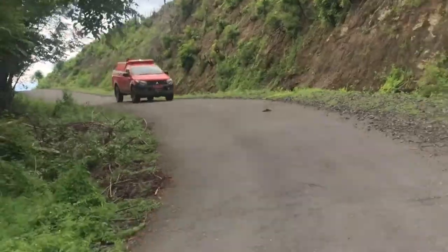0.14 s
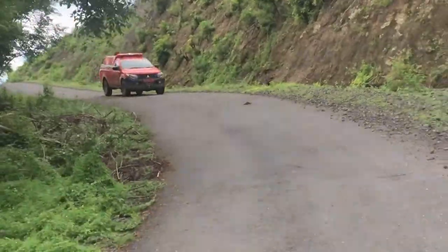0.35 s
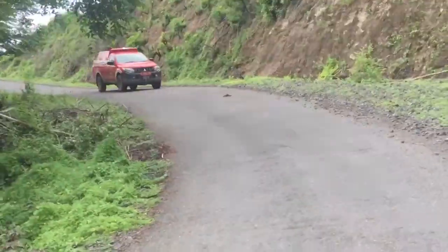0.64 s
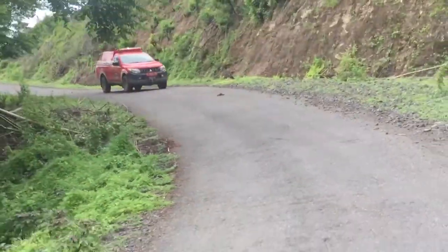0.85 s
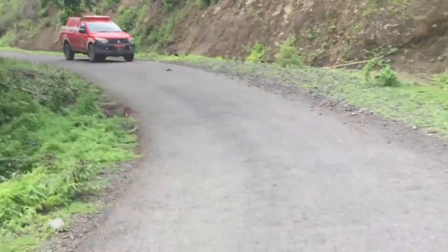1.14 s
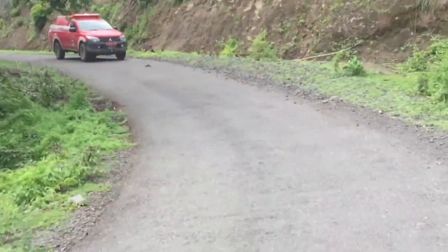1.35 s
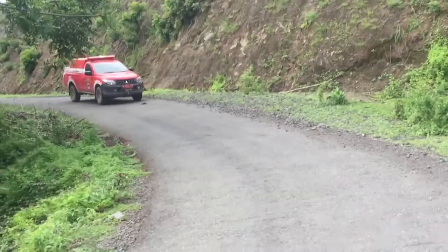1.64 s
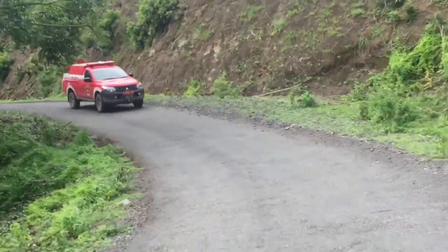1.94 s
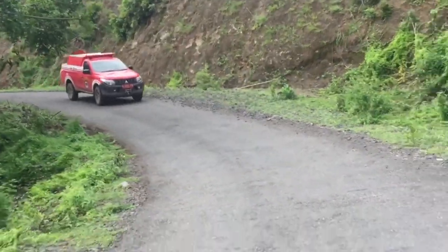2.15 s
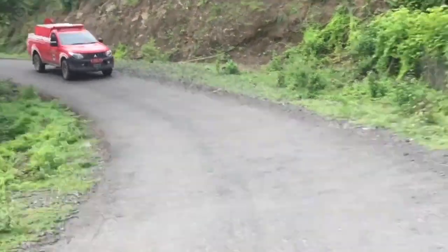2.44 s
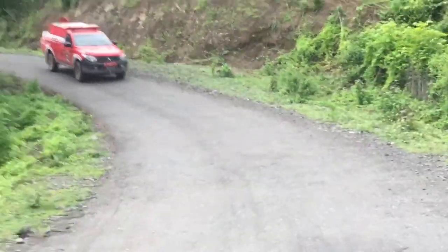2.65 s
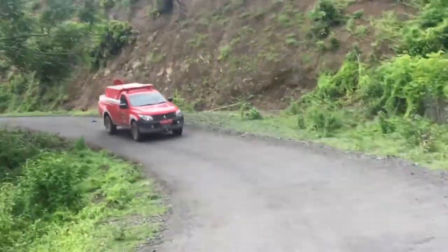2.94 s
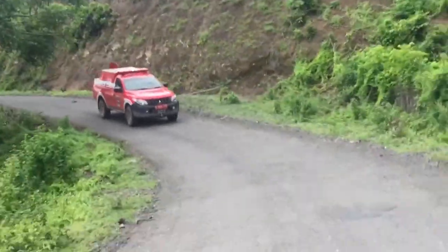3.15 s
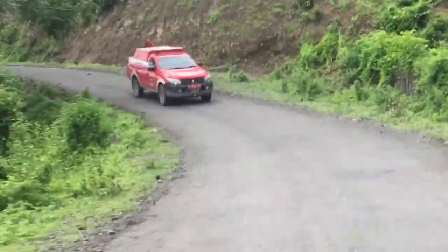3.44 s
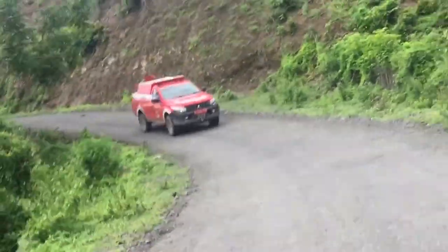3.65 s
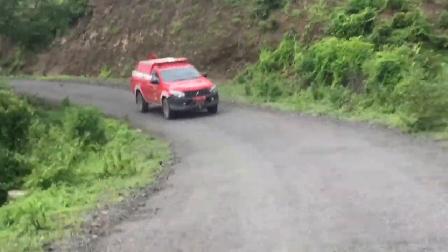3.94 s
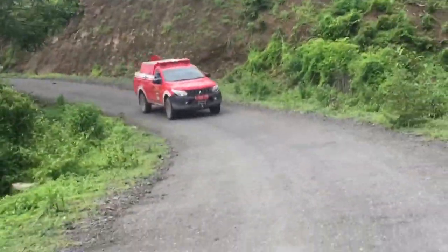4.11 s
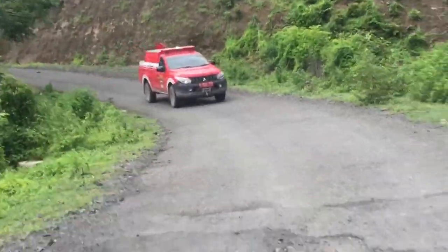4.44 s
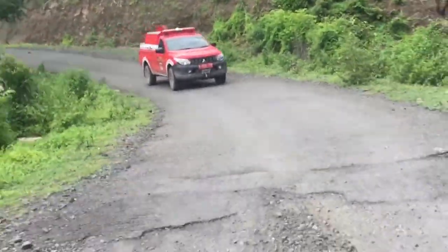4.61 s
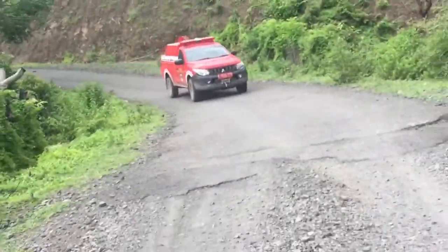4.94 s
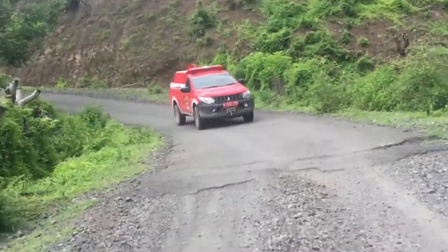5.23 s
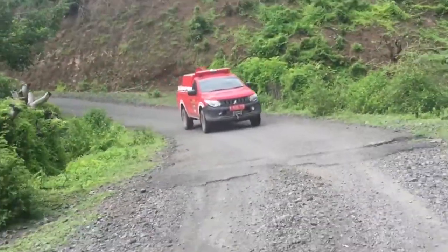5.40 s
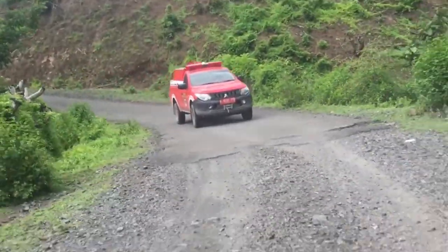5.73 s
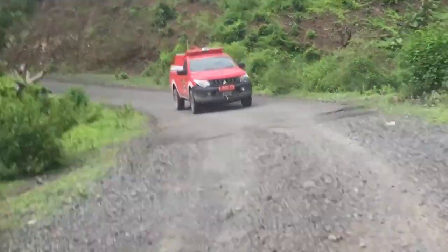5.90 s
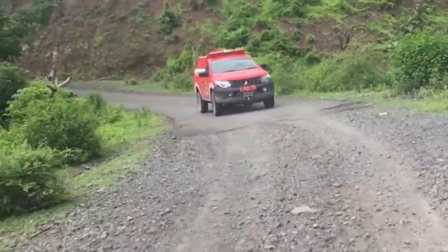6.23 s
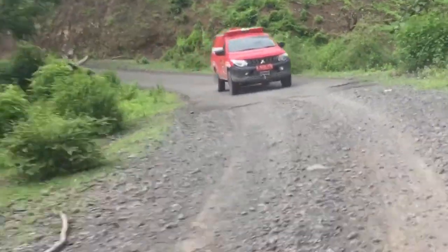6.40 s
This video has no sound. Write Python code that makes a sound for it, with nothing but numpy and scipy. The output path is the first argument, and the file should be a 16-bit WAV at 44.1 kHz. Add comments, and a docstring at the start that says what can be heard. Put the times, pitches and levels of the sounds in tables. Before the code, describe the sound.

Close, on-board sound of a truck travelling outdoors: low unsteady panel boom, quick judder and muffled suspension thumps. Thin insect rasps come and go early on. Tyre noise is modest on asphalt, then stones begin snapping and grinding, bursting loudest near the middle. Short dry metal knocks and sharp steel jingles crowd the second half, with a few bright grit ticks.

```python
"""First a dull clunk and a thump come through the floor of a truck, over a deep boom and a faint insect hiss.
We ride on its back along a mountain road that turns from worn asphalt to loose gravel.
Shaped noise makes the insects, the booming body and the roaring tyres.
Short rings and bursts of noise make the crunching stones, the knocks on the bed and the jingling steel.
"""
import sys
import numpy as np
from scipy import signal
from scipy.fft import rfft, irfft
from scipy.io import wavfile
from scipy.ndimage import uniform_filter1d

SR = 44100
rng = np.random.default_rng(int(sys.argv[2]) if len(sys.argv) > 2 else 0)


def materialize(psi):
    """Save the field psi as 16-bit PCM at rate SR to the path in sys.argv[1].

    A 1-D psi becomes a single channel; in a 2-D psi each row is a channel.
    """
    bounded = np.clip(np.atleast_2d(psi).T, -1, 1)
    quanta = np.round(bounded * 32767).astype(np.int16)
    wavfile.write(sys.argv[1], SR, quanta)


N = 289296
T = np.arange(N) / SR


def amp(db):
    """Turns decibels into a gain."""
    return 10 ** (np.asarray(db) / 20)


def evened(x):
    """Scales a sound to an rms of one."""
    return x / np.sqrt(np.mean(x ** 2) + 1e-20)


def at_level(x, db, size=441):
    """Sets the loudest 10 ms of a sound to the given level."""
    return amp(db) * x / np.sqrt(uniform_filter1d(x ** 2, size).max() + 1e-20)


def steadied(x, size=5000):
    """Takes the slow swells out of a noise, by dividing by its own level over about 0.1 s."""
    return x / np.sqrt(abs(uniform_filter1d(x ** 2, size)) + 1e-9)


def curve(rows, column=1):
    """Joins one column of a table by straight lines in time."""
    rows = np.asarray(rows)
    return np.interp(T, rows[:, 0], rows[:, column])


def swells(rows, attack_s, t60):
    """Gain of events that each rise, hold, and start to die away once their length has passed."""
    total = 0
    for s, length, db in rows:
        rise = np.clip((T - s) / attack_s, 0, 1)
        fall_db = 60 * np.clip((T - s - length) / t60, 0, 2)
        total = total + rise * amp(db - fall_db)
    return total


def fading_noise(t, t60):
    """A burst of noise that loses 60 dB in t60 seconds."""
    return rng.standard_normal(len(t)) * amp(-60 * t / t60)


def add(mix, s, sound):
    """Mixes a sound in at time s."""
    part = mix[max(round(s * SR), 0):][:len(sound)]
    part += sound[:len(part)]


def colour(x, spectrum, size=8192):
    """Gives a sound a spectrum with a filter that never acts ahead of time, so attacks stay sharp."""
    hz, db = np.transpose(spectrum)
    f = abs(np.fft.fftfreq(size, 1 / SR)) + 1
    log_gain = np.log(amp(np.interp(np.log(f), np.log(hz), db, left=db[0] - 9.5)))
    # the Hilbert transform finds the phase that packs the response at its start
    response = np.fft.ifft(np.exp(np.conj(signal.hilbert(log_gain)))).real[:size // 2]
    return signal.fftconvolve(x, response)[:len(x)]


def hiss(spectrum):
    """Steady noise with the given spectrum, falling away beyond its ends."""
    hz, db = np.transpose(spectrum)
    f = np.fft.rfftfreq(N, 1 / SR) + 1
    gain = amp(np.interp(np.log(f), np.log(hz), db))
    gain = gain * np.minimum(f / hz[0], 1) ** 2 * np.minimum(hz[-1] / f, 1) ** 2
    return evened(irfft(rfft(rng.standard_normal(N)) * gain, N))


def band(hz, width_hz):
    """Noise around one pitch, 12 dB down at the edges of its width; at zero hertz, a slow random wander."""
    f = np.fft.rfftfreq(N, 1 / SR)
    gain = 1 / (1 + (2 * (f - hz) / width_hz) ** 2) ** 2
    return evened(irfft(rfft(rng.standard_normal(N)) * gain, N))


def contacts(t, bounce_s, count=14):
    """A part grazes, strikes home and chatters to rest: a run of clicks that grow, then fade."""
    hits = np.zeros(len(t))
    gaps, sizes, signs = rng.random((3, count))
    when = np.cumsum(gaps * np.linspace(0, 1.5, count))  # the gaps tend to widen
    at = np.minimum((when * bounce_s * SR).astype(int), len(t) - 1)
    hits[at] = np.sign(signs - .5) * (.4 + sizes) * (.4 + when) * np.exp(-when)
    return hits


def struck(modes, t, vary_db, detune, lift_db=0):
    """Modes ring after a contact; where it lands changes their strengths and, slightly, their pitch."""
    hz, db, t60 = np.transpose(modes)[:, :, None]
    place, shift, side = rng.standard_normal((3, *hz.shape))
    hz = hz * (1 + detune * shift * np.minimum(.05 / t60, 1))  # long rings shift less
    strength = np.sign(side) * amp(db + lift_db + vary_db * place - 60 * t / t60)
    return (strength * np.sin(2 * np.pi * hz * t)).sum(0)


def pebble(t60, order=22):
    """The short ring of one hard contact: a handful of chance modes, the higher dying sooner."""
    t = np.arange(SR // 30) / SR
    steps, turn, size = rng.random((3, order, 1))
    hz = np.geomspace(400, 14000, order)[:, None] * (.88 + .24 * steps)
    life = t60 * np.sqrt(2000 / hz)  # t60 is the life at 2 kHz
    strength = (.3 + size) * hz ** .75 * amp(-60 * t / life)
    return (strength * np.sin(2 * np.pi * (hz * t + turn))).sum(0)


def walls(x, wet_db=-7, t60=0.087):
    """The steel sides of the truck bed scatter each sound for a moment."""
    t = np.arange(SR // 10) / SR
    echoes = fading_noise(t, t60) * (t > .003)
    return x + amp(wet_db) * signal.oaconvolve(x, echoes / np.linalg.norm(echoes))[:N]


# swelling phrases of a near insect: (time [s], length [s], level [dB])
INSECT_PHRASES = [(.02, 0.24, -64), (.36, 0.28, -64.5), (.98, 0.45, -66), (1.6, .5, -65.5)]


def insects(far_db=-72, near_db=0, waver_db=2):
    """Narrow noise rasps like a near insect that comes and goes, over a distant, wavering hiss."""
    phrases = 0
    for s, length, db in INSECT_PHRASES:
        phrases = phrases + amp(db) * np.sin(np.pi * np.clip((T - s) / length, 0, 1)) ** 2
    near = band(8180, 480) * phrases * amp(near_db)
    far = band(8900, 2000) * amp(far_db + waver_db * band(0, 12))
    return near + far


# tone of the body's boom: (frequency [Hz], relative level [dB per Hz])
BOOM_SPECTRUM = [(20, -31), (32, -24.5), (45, -9), (58, -1.5), (72, 0), (90, -2.5), (115, -9.5),
                 (170, -41.5)]
# tone of the panels' judder: (frequency [Hz], relative level [dB per Hz])
JUDDER_SPECTRUM = [(70, -45), (115, -1), (150, 0), (185, 0), (240, -7), (320, -11.5), (420, -27),
                   (700, -38.5)]
# how hard the road rocks the body, before sway: (time [s], level [dB])
ROCKING_LEVELS = [(0, -23), (.42, -23), (.76, -23.5), (.85, -33), (.97, -21), (1.85, -24.5), (2.05, -28.5),
                  (2.25, -24.5), (2.64, -25.5), (2.72, -31.5), (3.05, -32.5), (3.26, -25.5), (3.54, -31),
                  (3.73, -19), (3.95, -24), (5.4, -22.5), (6.1, -21), (6.56, -25)]
# the body drops on its springs and booms: (time [s], length [s], level [dB])
SPRING_DROPS = [(.72, 0.029, -17), (3.71, 0.051, -26), (5.1, 0.044, -14), (5.25, 0.065, -18.5),
                (5.52, 0.068, -17.5), (6.47, 0.09, -17)]
DROP_ATTACK_S, DROP_T60_S = 0.034, 0.14
# rough stretches that set the panels juddering, before judder_db: (time [s], length [s], level [dB])
ROUGH_STRETCHES = [(.03, 0.072, -27.5), (.26, 0.59, -28.5), (.92, 0.081, -25.5), (1.28, 0.27, -26.5),
                   (1.84, 0.1, -24), (2.77, 0.08, -25), (3.05, .3, -26), (3.61, 0.15, -21),
                   (4.03, 0.25, -24), (4.56, 0.21, -30.5), (5.15, 0.13, -23.5), (5.39, 0.17, -23),
                   (5.75, 0.48, -26), (6.37, 0.083, -29)]
RUT_ATTACK_S, RUT_T60_S = 0.013, 0.23


def body(boom_db=0.0, judder_db=-1, idle_judder_db=-8, sway_db=1.73):
    """The road shakes the truck's panels: a deep boom, and a quicker judder that flares in the ruts."""
    rocking = amp(curve(ROCKING_LEVELS) + sway_db * band(0, 22))
    booming = np.hypot(rocking, swells(SPRING_DROPS, DROP_ATTACK_S, DROP_T60_S))
    shaking = np.hypot(rocking * amp(idle_judder_db), swells(ROUGH_STRETCHES, RUT_ATTACK_S, RUT_T60_S))
    boom = steadied(hiss(BOOM_SPECTRUM)) * booming * amp(boom_db)
    judder = steadied(hiss(JUDDER_SPECTRUM)) * shaking * amp(judder_db)
    return boom + judder


# potholes, before the two trims: (time [s], thump level [dB], thump pitch [Hz], clunk level [dB])
POTHOLES = [(.038, -20, 160, -22), (.091, -33, 125, -21.5), (1.292, -16, 98, -36), (1.914, -13, 197, -17),
            (1.93, -14.5, 135, -33), (2.824, -15.5, 165, -32.5), (3.642, -17.5, 194, -17),
            (3.742, -11, 120, -47), (4.078, -11, 177, -33), (4.598, -9.5, 104, -25.5)]


def suspension(thump_db=-1, thump_t60=0.034, clunk_db=-3.5, clunk_t60=0.08):
    """Potholes send a short low tone and a dull burst of noise through the chassis."""
    out, t = np.zeros(N), np.arange(SR // 5) / SR
    clunk_spectrum = [(150, -2), (270, 4.0), (420, 7), (550, 2), (700, -2.5),
                      (1100, -32.5), (4000, -42), (12000, -67)]  # (Hz, dB)
    for s, push_db, hz, clatter_db in POTHOLES:
        push = np.sin(2 * np.pi * hz * t) * amp(-60 * t / thump_t60) * (1 - np.exp(-t / 0.0058))
        shake = fading_noise(t, clunk_t60) * (1 - np.exp(-t / 0.0046))
        clunk = colour(shake, clunk_spectrum)
        add(out, s, at_level(push, push_db + thump_db) + at_level(clunk, clatter_db + clunk_db))
    return out


# tone of the tyres' roar: (frequency [Hz], relative level [dB per Hz])
ROAR_SPECTRUM = [(150, 7), (350, 4.5), (550, 1), (780, -2.5), (1000, -1), (1250, -5.5), (1800, -7.5),
                 (2500, -13), (2900, -17), (4000, -23), (5000, -28.5), (7200, -38.5), (11000, -41.5),
                 (16000, -46)]
# asphalt turning to gravel: (time [s], tyre roar before roar_db [dB], gain of loose stone [dB])
ROAD_SURFACE = [(0, -40.5, -9.5), (.6, -44.5, -13), (1.3, -41.5, -12), (2.4, -43.5, -22), (2.9, -39, -15),
                (3.3, -37.5, -5), (4.0, -36, -12), (4.45, -37, -2.5), (4.8, -34.5, 0), (5.1, -39.5, -2),
                (5.5, -37, 1), (5.8, -38, -4), (6.56, -34.5, -1)]
# heaps of stone the tyres plough through: (time [s], length [s], gain of loose stone [dB])
STONE_HEAPS = [(3.1, 0.12, -6), (3.31, 0.038, 1.5), (3.63, 0.064, 10.5), (3.78, 0.039, -2), (4.17, 0.2, 2),
               (4.62, 0.036, 6), (4.77, 0.053, 2.5), (6.41, 0.045, 2)]
HEAP_ATTACK_S, HEAP_T60_S = 0.0094, 0.18


def tyres(roar_db=2, flutter_db=1.68, sway_db=1.25, plough_db=-41):
    """Tread roar: noise that flutters with the grain of the road and swells in the heaps."""
    ploughing = amp(plough_db) * swells(STONE_HEAPS, HEAP_ATTACK_S, HEAP_T60_S)
    level = np.hypot(amp(curve(ROAD_SURFACE) + roar_db), ploughing)
    unsteady_db = flutter_db * band(0, 130) + sway_db * band(0, 33)
    return hiss(ROAR_SPECTRUM) * level * amp(unsteady_db)


def loose_stone():
    """Gain of the crunch: the stone strewn on the surface, plus the heaps."""
    return amp(curve(ROAD_SURFACE, 2)) + swells(STONE_HEAPS, HEAP_ATTACK_S, HEAP_T60_S)


def sand(sand_db=-57, per_s=260, clump_db=5):
    """Fine grains spray off the tread in little flurries of single clicks."""
    flurries = amp(clump_db * np.clip(band(0, 60), -2, 2))
    grains = (rng.random(N) < per_s / SR) * rng.standard_normal(N) * flurries
    spectrum = [(1500, -4), (3500, 0.5), (6500, -1), (10000, -13), (15000, -16)]  # (Hz, dB)
    return evened(colour(grains, spectrum)) * amp(sand_db)


# tone of crunching stone: (frequency [Hz], relative level [dB per Hz])
CRUNCH_SPECTRUM = [(300, -10.5), (600, 8.5), (1400, -0.5), (2500, -3), (2900, -7), (3400, -5.5),
                   (5000, -12), (8000, -21), (12000, -30.5), (16000, -36)]


def stones(crunch_db=-46.0, per_s=380, spread_db=0.5, clump_db=3, stone_t60=0.042, count=24):
    """Stones snap against each other in clumps; each of the kinds of stone has its own ring."""
    out, clumps = np.zeros(N), amp(clump_db * band(0, 37))
    for _ in range(count):
        at = np.flatnonzero(rng.random(N) < per_s / count / SR)
        sizes = amp(spread_db * np.minimum(rng.exponential(1, 2000), 3.5))
        snaps = np.zeros(N)
        snaps[at] = np.resize(sizes, len(at)) * clumps[at]
        out += signal.oaconvolve(snaps, pebble(stone_t60))[:N]
    return evened(colour(out, CRUNCH_SPECTRUM)) * amp(crunch_db)


def crushed(crush_db=-45, per_s=34, spread_db=3, chatter_s=.005, stone_t60=0.044, count=16):
    """At chance moments a larger stone is squeezed out from under a tyre in a short burst of cracks."""
    out, t = np.zeros(N), np.arange(SR // 15) / SR
    for _ in range(count):
        burst = evened(signal.fftconvolve(contacts(t, chatter_s), pebble(stone_t60)))
        sizes = amp(spread_db * rng.uniform(-1.1, 1.5, N))
        starts = (rng.random(N) < per_s / count / SR) * sizes
        out += signal.oaconvolve(starts, burst)[:N]
    return evened(colour(out, CRUNCH_SPECTRUM)) * amp(crush_db)


# single chips of grit on metal, before tick_db: (time [s], level [dB])
GRIT_TICKS = [(1.141, -46), (3.323, -39), (3.566, -49), (4.055, -44), (4.384, -49), (4.540, -44),
              (4.571, -37), (4.893, -42), (5.283, -47), (5.589, -39), (6.538, -28)]


def grit(tick_db=-3, tick_t60=0.0054):
    """Tiny chips hit metal, each with one dry, very bright tick of noise."""
    out, t = np.zeros(N), np.arange(SR // 20) / SR
    spectrum = [(3000, -27), (7000, -7), (12000, 0), (15500, 4)]  # (Hz, dB)
    for s, db in GRIT_TICKS:
        tick = colour(fading_noise(t, tick_t60), spectrum)
        add(out, s, at_level(tick, db + tick_db))
    return out


def singing(skirt_db=-7):
    """One small part buzzes at a very high pitch and dies away: narrow noise with a wider skirt."""
    buzz = band(11250, 200) + amp(skirt_db) * band(10800, 750)
    return buzz * swells([(4.18, 0.11, -41)], attack_s=0.016, t60=0.23)  # (time s, length s, dB)


# loudest blows: (time [s], jingle level [dB], knock level [dB], top treble level [dB])
LOUD_BLOWS = [(.1064, -66, -43, -66), (.3416, -72, -41, -77), (.4884, -66, -48, -70),
              (.6719, -60, -40, -72), (1.1408, -62, -39.5, -62), (1.1787, -56, -43.5, -69),
              (1.272, -45.5, -35.5, -53), (1.3683, -47, -38.5, -69), (1.6931, -61, -41.5, -68),
              (1.7584, -51, -40, -68), (1.8138, -52, -39.5, -62), (1.8527, -47.5, -35, -57),
              (2.2682, -52, -53, -71), (2.3067, -54.5, -61, -75), (2.5426, -57, -41, -74),
              (2.7771, -45.5, -39, -56), (2.8774, -50, -56, -51), (3.1158, -40, -29.5, -53),
              (3.1901, -50, -31, -70), (3.3204, -39, -29, -46), (3.3374, -40.5, -40, -43),
              (3.4815, -41.5, -58, -60), (3.5668, -51, -37, -66), (3.6222, -37, -30.5, -47),
              (3.6446, -34, -24.5, -32), (3.6566, -28.5, -28, -35), (3.6704, -26.5, -32, -29),
              (3.7135, -41.5, -30.5, -50), (3.7713, -37.5, -33, -45), (3.8182, -31.5, -30.5, -43),
              (3.915, -57, -43, -72), (4.0557, -39.5, -40, -32), (4.1584, -37.5, -30, -41),
              (4.1744, -34.5, -20, -35), (4.2363, -37, -42, -44), (4.2567, -31, -30, -42),
              (4.34, -35.5, -29, -50), (4.3594, -58, -37, -49), (4.4199, -55, -32.5, -67),
              (4.4927, -46, -32, -68), (4.6234, -47, -29, -59), (4.6483, -33.5, -36, -42),
              (4.7484, -33.5, -29, -46), (4.8065, -30, -32.5, -39), (4.8938, -41.5, -40, -37),
              (4.9314, -50, -32.5, -64), (5.024, -53, -34.5, -54), (5.0454, -37, -38.5, -39),
              (5.1542, -41.5, -33, -58), (5.2624, -42.5, -36, -56), (5.2849, -43.5, -43, -54),
              (5.3243, -37, -28, -49), (5.4291, -36.5, -34, -42), (5.4969, -28, -30.5, -34),
              (5.5393, -36, -38, -46), (5.5737, -42, -50, -52), (5.6176, -31, -31, -43),
              (5.6905, -40, -39, -57), (5.8894, -40, -32.5, -55), (5.9514, -40, -33.5, -46),
              (5.9678, -35.5, -31, -46), (5.9829, -39, -31, -35), (6.0761, -37.5, -28.5, -36),
              (6.315, -49, -37.5, -44), (6.4188, -43, -38.5, -49), (6.4614, -53, -34.5, -61),
              (6.5081, -45, -38, -54), (6.5375, -35.5, -35.5, -33)]
# lighter blows where loose stone is at 0 dB: (jingle level [dB], knock level [dB], top treble level [dB])
LIGHT_LEVELS = (-46.5, -37, -59)


def blows(spread_db=2.5, crowding=.09, count=46, follow=1.06):
    """The loud blows, and lighter ones by chance, more often and stronger where the road is stony."""
    stone_db = curve(ROAD_SURFACE, 2)
    odds = np.cumsum(np.exp(crowding * stone_db))
    draws = (np.arange(count) + rng.random(count)) / count
    at = np.minimum(np.searchsorted(odds / odds[-1], draws), N - 1)
    # follow: dB of blow per dB of loose stone
    levels = np.array(LIGHT_LEVELS) + follow * stone_db[at, None]
    levels = levels + spread_db * rng.uniform(-1.9, 1.84, (count, 3))
    return np.vstack([LOUD_BLOWS, np.column_stack([T[at], levels])])


# ringing modes of the truck bed: (frequency [Hz], relative level [dB], time to fall 60 dB [s])
BED_MODES = [(545, 2.5, 0.037), (854, 2.5, 0.038), (935, 1.5, 0.021), (1303, -1, 0.04), (1476, -0.5, 0.032),
             (1670, 0.5, 0.026), (1898, 3, 0.041), (2137, 1.5, 0.017), (2320, -0.5, 0.018),
             (2573, 5.5, 0.02), (2830, -26, 0.012), (3248, 3, 0.011), (3480, -4.5, 0.03),
             (3840, -6.5, 0.036), (4386, -3.5, 0.025), (4800, 1, 0.013), (5330, -5.5, 0.018)]
# tone of a blow's scrape on the bed: (frequency [Hz], relative level [dB per Hz])
SCRAPE_SPECTRUM = [(250, -10), (550, 8.5), (900, -2), (1350, 9.5), (1800, 2), (2400, 2), (3100, -6),
                   (4600, -10.5), (6000, -25), (9000, -78), (15000, -17)]


def knocks(strikes, knock_db=1, scrape_db=-5, scrape_t60=0.12, chatter_s=.0045, vary_db=4, detune=0.015,
           dull_hz=7000):
    """Each blow clatters on the truck bed, whose panels ring briefly and pass little treble."""
    out, t = np.zeros(N), np.arange(SR // 6) / SR
    for s, _, blow_db, _ in strikes:
        ring = struck(BED_MODES, t, vary_db, detune)
        clatter = signal.fftconvolve(contacts(t, chatter_s), ring)[:len(t)]
        rub = fading_noise(t, scrape_t60) * (1 - np.exp(-t / 0.00074))
        scrape = colour(rub, SCRAPE_SPECTRUM)
        add(out, s, at_level(evened(clatter) + amp(scrape_db) * evened(scrape), blow_db + knock_db))
    lowpass = signal.butter(2, min(dull_hz, SR / 3), fs=SR, output="sos")
    return signal.sosfilt(lowpass, out)


# tone of a click on steel: (frequency [Hz], relative level [dB per Hz])
CLICK_SPECTRUM = [(2000, -14), (4200, -3.5), (5800, -2), (6400, 1), (7400, -9.5), (8600, -5.5),
                  (10200, -4.5), (12500, -3.5), (13800, -6), (14800, -20), (16000, -15)]
# ringing modes of the steel fittings: (frequency [Hz], relative level [dB], time to fall 60 dB [s])
STEEL_MODES = [(6056, -12, .28), (6290, -4, .05), (6390, 0, .08), (6520, -4, .05), (6977, -9, .05),
               (7553, -8, .09), (8390, 0, .05), (8440, 2, .08), (8818, -5, .05), (9744, -17, .3),
               (10417, -14, .12), (11989, -16, .1), (12355, -10, .14), (13561, -13, .06), (14433, -6, .06),
               (14707, -7, .1), (14858, -8, .11), (15079, -12, .09)]


def fittings(strikes, click_db=0, ring_db=-4, click_t60=0.009, bounce_s=0.0032, vary_db=6.5, top_db=0,
             detune=0.0046):
    """The same blows click and ring the loose steel; harder contacts are brighter."""
    out, t = np.zeros(N), np.arange(SR // 3) / SR
    for s, jingle_db, _, treble_db in strikes:
        hardness_db = np.clip(treble_db - jingle_db + top_db, -20, 10)

        def bright(hz):
            """Treble lift in dB, growing from 8 to 11 kHz."""
            return hardness_db * np.clip((hz - 8000) / 3000, 0, 1)

        click = colour(fading_noise(t, click_t60), [(hz, db + bright(hz)) for hz, db in CLICK_SPECTRUM])
        ring = struck(STEEL_MODES, t, vary_db, detune, bright(np.array(STEEL_MODES)[:, :1]))
        hits = contacts(t, bounce_s)
        for part, part_db in (click, click_db), (ring, ring_db):
            chatter = signal.fftconvolve(part, hits)[:len(t)]
            add(out, s, at_level(chatter, jingle_db + part_db))
    return out


def scene():
    """Everything as heard from the truck bed."""
    gravel = (stones() + crushed() + walls(sand())) * loose_stone()
    road = body() + tyres() + gravel + suspension()
    strikes = blows()
    rattle = walls(knocks(strikes) + fittings(strikes)) + singing() + grit()
    return (insects() + road + rattle)[None]


def record(dry, edge_hz=15800):
    """Takes away the treble above the edge with a steep low-pass filter."""
    lowpass = signal.firwin(401, edge_hz, window=("kaiser", 9), fs=SR)
    return signal.oaconvolve(dry, lowpass[None], "same")


dry = scene()
out = record(dry)
materialize(out)
```